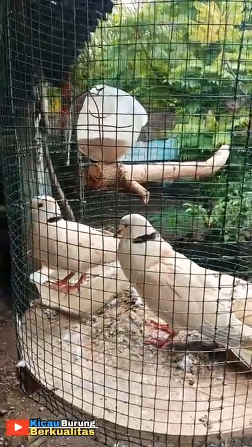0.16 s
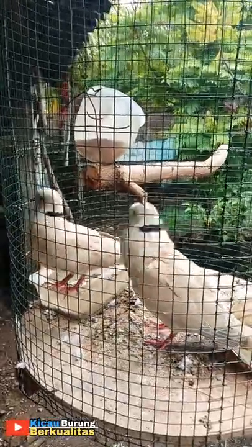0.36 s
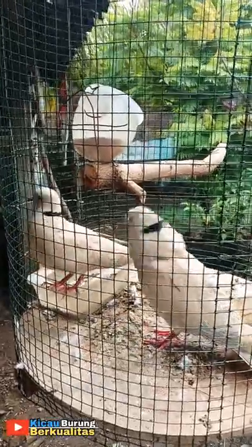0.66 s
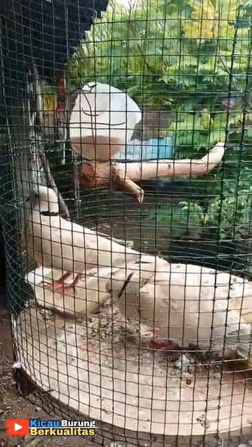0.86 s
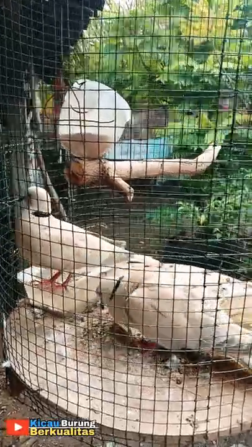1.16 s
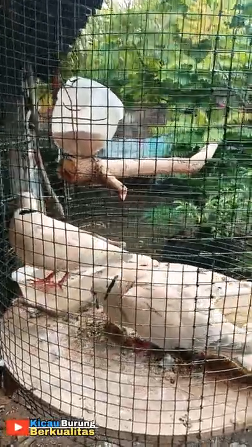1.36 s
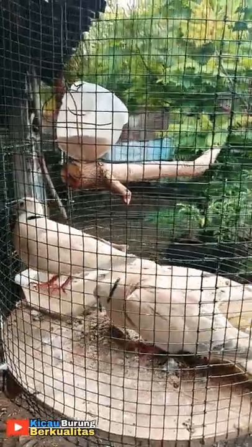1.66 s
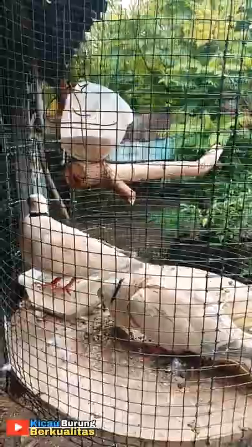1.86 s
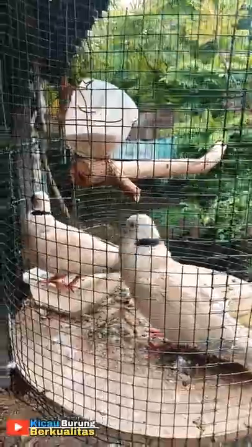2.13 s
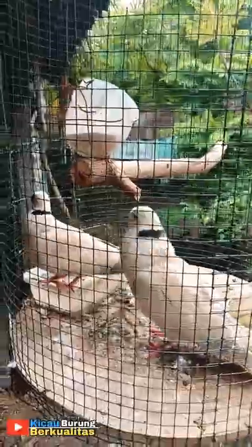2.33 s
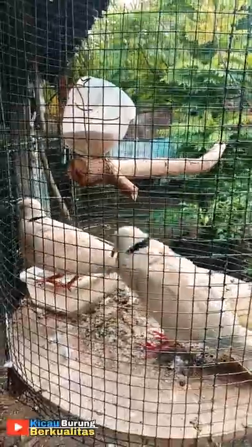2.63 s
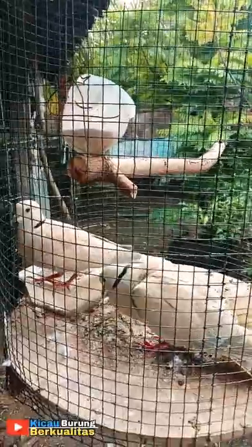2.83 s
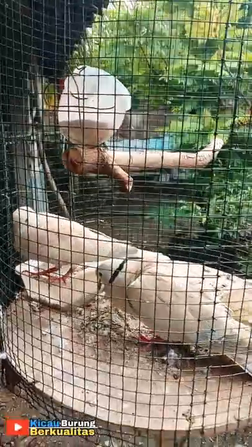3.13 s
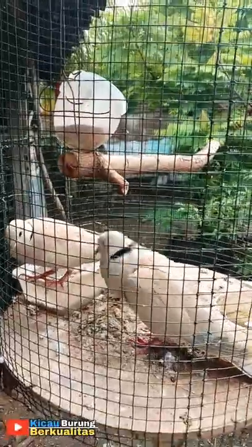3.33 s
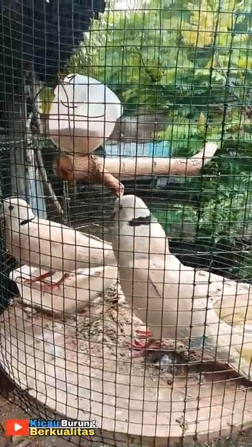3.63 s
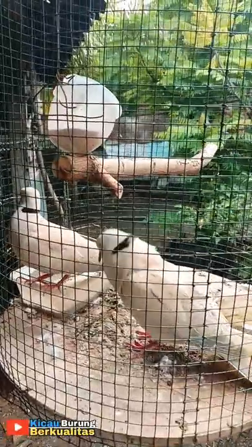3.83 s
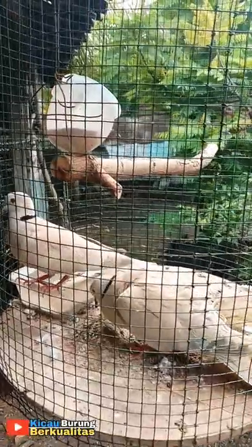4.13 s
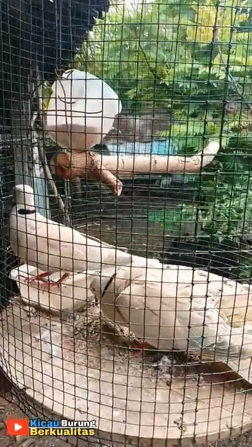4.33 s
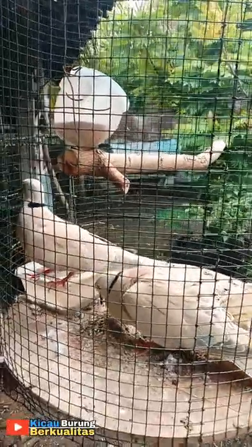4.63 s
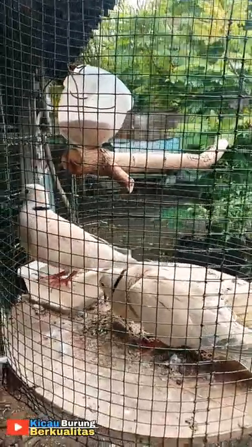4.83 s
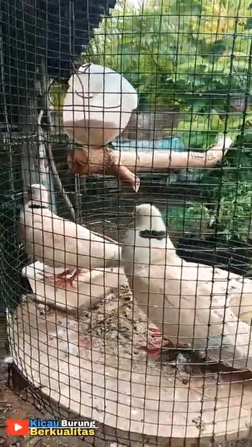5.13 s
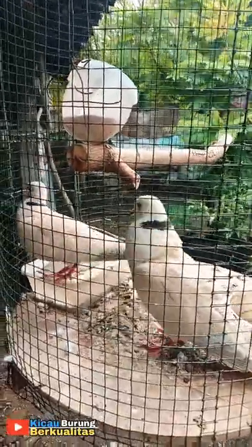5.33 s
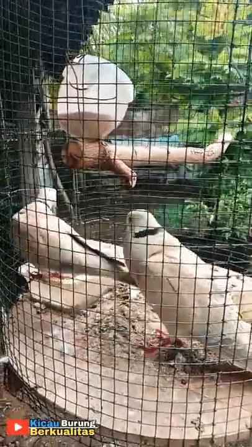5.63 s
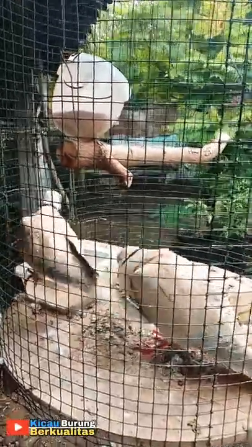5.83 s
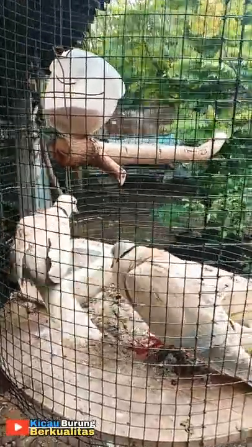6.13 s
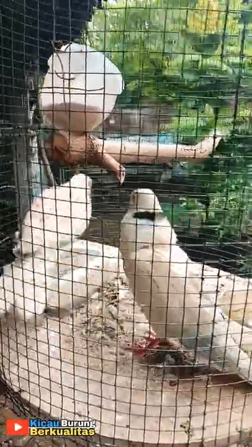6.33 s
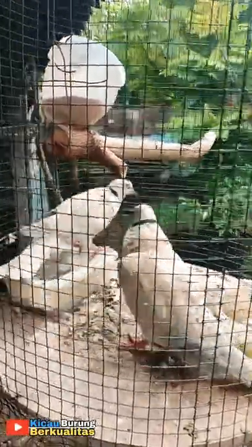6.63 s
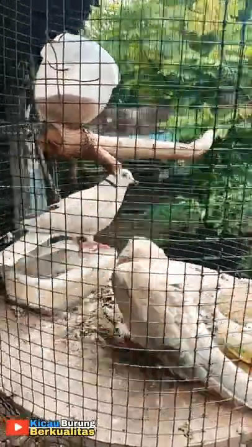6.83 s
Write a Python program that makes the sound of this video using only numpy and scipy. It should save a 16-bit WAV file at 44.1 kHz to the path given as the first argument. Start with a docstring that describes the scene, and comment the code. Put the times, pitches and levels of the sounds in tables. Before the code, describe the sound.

In a garden cage, a near dove dominates, close and nearly dry. The tail of a long, hollow coo sighs away by 0.25 s. At 0.8 s a short note flips upward, then from 1.0 to 1.8 s a throaty trill rolls faster and louder into a steady mid-pitched coo, breaking lower at 2.3 s and sighing out by 2.6 s. Distant doves hoot, growl and trill around 2.6-3.9 s. The near phrase repeats: short note at 3.95, trill from 4.2, long coo from 5.0, break at 5.5, sigh to 5.9. A hoarse far trill and coo answer until 6.7. Faint chick peeps and thin whistles scatter throughout; a hen calls very faintly at 0.8-1.7 s. Small claw taps grow into sharper wood and wire rattles at 5.7 and 6.2-6.5 s, with light feather and foot rustles. A last short note begins near 6.9 s. Quiet leaves and far-road rumble lie beneath.

```python
"""Collared dove in a garden cage

A near dove coos: a short note, a rolling trill, a long note that breaks down into a sigh; far doves answer.
All bird voices are sines with wandering pitch and level; growls, murmur and throat air are shaped noise.
Chicks peep, a hen calls faintly; taps are noise bursts that also ring perch modes, rustles are noise strokes.
Behind: leaf noise stirred band by band and the rumble of a far road."""
import sys
import numpy as np
from scipy import signal
from scipy.fft import rfft, irfft, next_fast_len
from scipy.io import wavfile
from scipy.ndimage import uniform_filter1d, map_coordinates

SR = 44100
rng = np.random.default_rng(int(sys.argv[2]) if len(sys.argv) > 2 else 0)


def master(y):
    """Save y as 16-bit WAV."""
    cut = np.clip(np.atleast_2d(y).T, -1, 1)
    pcm = np.round(cut * 32767)  # scale
    wavfile.write(sys.argv[1], SR, pcm.astype(np.int16))


N = 307818
TIME = np.arange(N) / SR
BREAK_S = 0.004  # speed of a voice break


# near dove, short notes: break_s, scoop_s (before break), length_s (after break), swell_db
SHORT_NOTES = [(0.789, 0.029, 0.15, 10), (3.947, 0.028, 0.18, 7), (6.924, 0.033, 0.13, 22)]
# short-note harmonics, fundamental up: gain_db
SHORT_NOTE_OVERTONES = [1, -34, -51, -52.5]
# near dove, long coos: start_s, break_s, end_s, pitch_hz, level_db (before harmonics), swell_db
COOS = [(-0.6, -0.062, 0.25, 514, -21.5, 3), (1.808, 2.289, 2.6, 511.9, -24, 5),
        (4.971, 5.543, 5.91, 517.1, -22, 3)]
# near dove, two trills: start_s, level_db (before harmonics)
BEATS = [(1.04, -41.5), (1.132, -39), (1.187, -36), (1.226, -36), (1.27, -30.5), (1.314, -29.5),
         (1.356, -28), (1.404, -27), (1.452, -25), (1.505, -24.5), (1.567, -22.5), (1.631, -20),
         (1.716, -20.5), (4.22, -37.5), (4.266, -36), (4.311, -35), (4.358, -32), (4.4, -32.5),
         (4.441, -31), (4.483, -29.5), (4.526, -26.5), (4.569, -26.5), (4.616, -26), (4.669, -24.5),
         (4.729, -20.5), (4.796, -20), (4.876, -20)]
# coo harmonics, fundamental up: gain_db
NEAR_OVERTONES = [0.5, -42.5, -58]
# spectrum of throat air and of the blurred far doves: freq_hz, gain_db (relative)
MURMUR_COLOUR = [(250, -25), (380, -2), (470, 4.5), (540, -9), (600, 0.5), (690, -17.5), (820, -18.5),
                 (1000, -43.5)]


def near_dove(rush_db=-37, trill_rush_db=-23, flutter_db=1.24, settle_s=0.19, sigh_flutter_db=1.5):
    """Close, almost dry voice; coos flutter until settled and in the sigh; throat air follows loudness."""
    calls = [short_note(*row) for row in SHORT_NOTES]
    coos = [long_coo(*row, scoop_s=.04, sag=0.063, drop_db=8, sigh_db=11.5, step_db=5.5) for row in COOS]
    unsteady_db = np.zeros(N)
    for s, break_s, end_s, *_ in COOS:
        sigh = np.clip((TIME - break_s) / (end_s - break_s), 0, 1)
        unsteady_db += flutter_db * np.exp(-((TIME - s) / settle_s) ** 2)
        unsteady_db += sigh_flutter_db * np.sin(np.pi * sigh)
    song = held_notes(calls, SHORT_NOTE_OVERTONES, jitter=.004, shimmer_db=.7, fade_s=.008)
    long_notes = held_notes(coos, NEAR_OVERTONES, jitter=.003, shimmer_db=.25, fade_s=.008)
    song += from_db(unsteady_db * drift(85)) * long_notes
    rolls = trill(BEATS, top_db=-19.5, top_hz=484, hum_hz=418, hum_db=-29.0, hum_s=0.052,
                  hum_below_db=4.5, dip=.04, edge_s=0.0032, rough_db=2.0)
    rush = from_db(rush_db) * np.abs(song) + from_db(trill_rush_db) * np.abs(rolls)
    airflow = uniform_filter1d(rush, size=400)
    return scatter(song + rolls + airflow * noise(MURMUR_COLOUR), t60_s=.35, wet_db=-28)


def short_note(s, scoop_s, length_s, swell_db, low_hz=385, break_hz=495, high_hz=565, sag=.08,
               accent_db=-19, rise_db=22, rest_db=-33, swell_at=0.75, swell_width=0.23, release_db=11):
    """Loud upward scoop breaks to a softer high note that sags, swells, stops: rows s, hz, db."""
    t = np.linspace(-scoop_s, length_s, 300)
    early, u = np.clip(-t / scoop_s, 0, 1), np.clip(t / length_s, 0, 1)
    high = .5 + .5 * np.tanh(t / BREAK_S)
    scoop_hz = break_hz + (low_hz - break_hz) * early
    scoop_db = accent_db - rise_db * early ** 2.0
    note_hz = high_hz * (1 - sag * np.sin(np.pi / 2 * u))
    swell = np.exp(-((u - swell_at) / swell_width) ** 2)
    note_db = rest_db + swell_db * swell - release_db * u ** 10
    hz = scoop_hz + high * (note_hz - scoop_hz)
    db = scoop_db + high * (note_db - scoop_db)
    return np.transpose([s + t, hz, db])


def long_coo(s, break_s, end_s, hz, db, swell_db, scoop_s, sag, drop_db, sigh_db,
             step_db=0, step_after_s=0.156, scoop=0.3, rise_db=12, droop=0.057,
             sigh_start=.83, sigh_fall=.275):
    """Voice scoops up, sags and swells, breaks down to a falling sigh, may step weaker: rows s, hz, db."""
    t = np.linspace(s - scoop_s, end_s, 900)
    early = np.clip((s - t) / scoop_s, 0, 1)
    u = np.clip((t - s) / (break_s - s), 0, 1)
    v = np.clip((t - break_s) / (end_s - break_s), 0, 1)
    broken = .5 + .5 * np.tanh((t - break_s) / BREAK_S)
    spent = .5 + .5 * np.tanh((t - break_s - step_after_s) / BREAK_S)
    held = 1 - scoop * early - sag * u ** 1.5 - droop * u ** 20
    sigh = sigh_start * (1 - sigh_fall * v ** 2)
    level_db = db - rise_db * early ** 2 + swell_db * u
    level_db = level_db - drop_db * broken - sigh_db * v ** 2.3 - step_db * spent
    return np.transpose([t, hz * (held + broken * (sigh - held)), level_db])


def trill(beats, top_db, top_hz, hum_hz, hum_db, hum_s, hum_below_db, dip, edge_s, rough_db,
          arch=.04, pause_s=.007):
    """Abrupt beats arch in pitch, higher and longer with effort; a weaker, rougher hum fills the gaps."""
    out, tremor, quaver = np.zeros(N), drift(130), drift(90)
    next_starts = [row[0] for row in beats[1:]] + [np.inf]
    for (s, db), following in zip(beats, next_starts):
        length_s = .01 + .02 * np.exp((db - top_db) / 2.5)
        hz = top_hz * np.exp((db - top_db) / 60)
        on = (TIME > s - .02) & (TIME < s + .12)
        t = TIME[on] - s
        opened = .5 + .5 * np.tanh(t / edge_s)
        closed = .5 + .5 * np.tanh((t - length_s) / edge_s)
        gap_s = np.clip(following - s - length_s - pause_s, .005, hum_s)
        after = np.clip((t - length_s) / gap_s, 0, 1)
        bow = np.abs(np.sin(np.pi * after))
        beat = from_db(db) * opened * (1 - closed)
        hum = from_db(min(db - hum_below_db, hum_db)) * np.sqrt(bow) * (1 - after / 2)
        high_hz = hz * (1 + arch * (np.sin(np.pi * np.clip(t / length_s, 0, 1)) - .5))
        low_hz = min(hz, hum_hz) * (1 - dip * bow)
        pitch_hz = (high_hz + closed * (low_hz - high_hz)) * (1 + .012 * quaver[on])
        roughness = from_db(rough_db * closed * tremor[on])
        out[on] += (beat + hum) * roughness * voice(pitch_hz, NEAR_OVERTONES)
    return out


def held_notes(notes, overtones, jitter, shimmer_db, fade_s):
    """Sung notes follow pitch and level curves with a slight quaver."""
    out, quaver, tremor = np.zeros(N), drift(70), drift(60)
    for rows in notes:
        hz, db = in_time(rows)
        inside_s = np.minimum(TIME - rows[0][0], rows[-1][0] - TIME)
        gate = np.clip(1 + inside_s / fade_s, 0, 1)  # fades lie outside the note
        on = gate > 0
        level = from_db(db[on] + shimmer_db * tremor[on]) * np.sin(np.pi / 2 * gate[on]) ** 2
        out[on] += level * voice(hz[on] * (1 + jitter * quaver[on]), overtones)
    return out


def voice(hz, overtones_db, wander_db=3.5):
    """Harmonic sines; those above the fundamental come and go as the bird moves."""
    phase = 2 * np.pi * (np.cumsum(hz) / SR + rng.random())
    out = np.zeros(len(hz))
    for k, db in enumerate(overtones_db, 1):
        gain = from_db(db + (k > 1) * wander_db * drift(30, size=len(hz)))
        out += gain * np.sin(k * phase)
    return np.sqrt(2) * out


# far coos: start_s, break_s, end_s, pitch_hz, level_db (before harmonics), swell_db, sag_share
FAR_COOS = [(3.649, 3.947, 4.29, 529, -41, 1.5, .11), (6.24, 6.544, 6.72, 485.6, -40.5, 0, 0.0637)]
# far coo harmonics, fundamental up: gain_db
FAR_OVERTONES = [2.4]
# plain sagging hoots: start_s, length_s, start_pitch_hz, level_db (before harmonics, low-pass)
HOOTS = [(0.268, 0.54, 425, -50.5), (0.312, 0.14, 634, -51), (2.6, 0.056, 592, -40),
         (2.712, 0.306, 418.8, -51), (3.071, 0.17, 369.6, -57), (4.99, 0.3, 410, -50)]
# hoot harmonics, fundamental up: gain_db
HOOT_OVERTONES = [2.5, -19.5]
# far, halting trill beats: start_s, level_db (before harmonics)
FAR_BEATS = [(3.283, -38), (3.352, -42.5), (3.418, -38), (3.512, -36.5), (5.875, -35), (5.945, -34),
             (6.04, -34.5), (6.118, -34.5)]
# hoarse toneless stretches: start_s, length_s, peak_level_db
GROWLS = [(1.57, 0.1, -40), (2.426, 0.21, -50), (3.104, .16, -57), (3.758, 0.21, -43), (6.157, 0.2, -44.5)]
# growl spectrum: freq_hz, gain_db (relative)
GROWL_COLOUR = [(400, -16), (520, -4), (600, 5), (680, -3.5), (800, -12), (950, -32.5)]
# blur of many doves: time_s, level_db (before murmur_db)
MURMUR = [(0.0, -49.5), (0.9, -54.5), (1.94, -62), (2.55, -44.5), (2.82, -62.5), (3.4, -63.5),
          (3.88, -47.5), (4.04, -52.5), (4.86, -46.5), (6.04, -64.5), (6.26, -57), (6.98, -48.5)]


def far_doves(murmur_db=4, hoot_sag=0.083, throat_hz=860):
    """Answering voices, wetter, hoarser, less steady, over a swelling noise murmur of the rest."""
    notes = [long_coo(*row, scoop_s=0.12, sag=sag, drop_db=2.0, sigh_db=13.0,
                      sigh_start=.775, sigh_fall=0.1415) for *row, sag in FAR_COOS]
    coos = held_notes(notes, FAR_OVERTONES, jitter=0.0022, shimmer_db=2.5, fade_s=0.03)
    sagging = [[(s, hz, db), (s + length_s, hz * (1 - hoot_sag), db)] for s, length_s, hz, db in HOOTS]
    hoots = held_notes(sagging, HOOT_OVERTONES, jitter=0.0021, shimmer_db=1.5, fade_s=0.04)
    hoots = signal.sosfilt(signal.butter(10, throat_hz, fs=SR, output="sos"), hoots)
    rolls = trill(FAR_BEATS, top_db=-32, top_hz=478, hum_hz=415.0, hum_db=-37, hum_s=0.062,
                  hum_below_db=5, dip=0.1436, edge_s=0.0067, rough_db=3.5)
    growls = sum(from_db(db) * stroke(s, length_s) for s, length_s, db in GROWLS)
    calls = coos + hoots + rolls + growls * noise(GROWL_COLOUR)
    swell_db = 3 * drift(14)
    murmur = from_db(in_time(MURMUR)[0] + murmur_db + swell_db) * noise(MURMUR_COLOUR)
    return scatter(calls, t60_s=.3, wet_db=-7) + murmur


# claws, beaks on wood and wire: start_s, tick_db (before tick_db trim), knock_db (relative drive)
TAPS = [(0.464, -44, -64), (1.8777, -43, -51), (1.9445, -46, -61), (2.412, -45.5, -64), (3.1434, -54, -82),
        (3.829, -57.5, -53), (4.6502, -55, -48), (4.691, -41.5, -58), (5.1351, -40, -44.5),
        (5.4959, -67, -51.5), (5.662, -30.5, -53), (5.707, -42.5, -43.5), (5.8482, -52, -48.5),
        (6.2138, -29, -36.5), (6.324, -36, -40.5), (6.352, -34.5, -35), (6.427, -32, -41),
        (6.451, -32.5, -46.5), (6.756, -44, -62), (6.7853, -49, -59.5)]
# tick spectrum: freq_hz, gain_db (relative)
TICK_COLOUR = [(1500, -20.5), (2800, 0), (4000, -4.5), (5500, 2), (7300, 4.5), (9000, -6.5), (12000, -19),
               (15500, -9)]
# perch modes: freq_hz (mean-ish, varies per tap), gain_db, t60_s
PERCH_MODES = [(1266, 6.5, 0.032), (1628, 6, 0.016), (1640, -5.5, 0.012), (3050, -13, 0.018)]


def taps(onset_s=0.00052, crack_s=0.0035, rattle_s=0.026, rattle_db=-15, tick_db=-8,
         chatter_db=3, spot_spread=0.0078):
    """Brief contact, uneven mesh rattle; noise drives perch modes, detuned a little at each spot."""
    tick, wood = np.zeros(N), np.zeros(N)
    for s, bright_db, woody_db in TAPS:
        on = (TIME >= s) & (TIME < s + .15)
        t = TIME[on] - s
        decay = np.exp(-t / crack_s) + from_db(rattle_db) * np.exp(-t / rattle_s)
        blow = np.minimum(t / onset_s, 1) * decay
        tick[on] += from_db(bright_db + tick_db) * blow
        grit = rng.standard_normal(SR // 4)[:len(t)]
        force = from_db(woody_db) * blow / np.linalg.norm(blow) * grit
        for hz, db, t60_s in PERCH_MODES:
            mode_hz = hz * (1 + spot_spread * rng.uniform(-0.92, 1))
            wood[on] += from_db(db) * ring(force, mode_hz, t60_s)
    rattle = tick * from_db(chatter_db * drift(400)) * noise(TICK_COLOUR)
    return scatter(rattle + wood, t60_s=0.059, wet_db=-12.0)


def ring(x, hz, t60_s):
    """Two-pole resonator: a unit click starts a decaying sine of height 1."""
    r, w = from_db(-60 / (t60_s * SR)), 2 * np.pi * hz / SR
    return signal.lfilter([0, np.sin(w)], [1, -2 * r * np.cos(w), r * r], x + 1e-18)


# feathers brush, feet shuffle: start_s, length_s, hiss_db, scrape_db (peak, before grain)
RUSTLES = [(0.958, 0.13, -62.5, -82.5), (1.114, 0.087, -55.5, -92), (4.222, 0.073, -57.5, -58),
           (4.827, 0.061, -90, -50.5), (6.414, 0.078, -51.5, -55), (6.624, 0.066, -57.5, -67)]
# feather spectrum: freq_hz, gain_db (relative)
HISS_COLOUR = [(4000, -5), (5800, 1), (7400, 4.5), (8800, -25), (15000, -31.5)]
# foot spectrum: freq_hz, gain_db (relative)
SCRAPE_COLOUR = [(700, -10), (1250, 14), (1700, 1.5), (2600, -4.5), (5000, -27)]


def rustles(grain_db=3.0):
    """Feathers hiss, feet scrape: grainy half-sine strokes of shaped noise."""
    hiss, scrape = np.zeros(N), np.zeros(N)
    for s, length_s, hiss_db, scrape_db in RUSTLES:
        hiss += from_db(hiss_db) * stroke(s, length_s)
        scrape += from_db(scrape_db) * stroke(s, length_s)
    brushed = hiss * noise(HISS_COLOUR) + scrape * noise(SCRAPE_COLOUR)
    return brushed * from_db(grain_db * drift(270))


# peeps, hold then drop hoarsely: start_s, length_s, start_pitch_hz, level_db (before chicks' level_db)
PEEPS = [(0.097, 0.077, 4340, -65), (0.605, 0.11, 5350, -60.5), (1.382, .18, 3755, -67),
         (2.083, 0.047, 3705, -69.5), (2.149, 0.082, 4300, -71.5), (2.244, 0.14, 3890, -73.5),
         (2.774, 0.13, 3840, -68), (2.965, 0.058, 3900, -70), (3.331, 0.079, 3670, -63),
         (3.668, .13, 3774, -62.5), (3.83, 0.072, 4380, -68), (3.95, .06, 3530, -65.5),
         (4.41, 0.073, 3830, -62), (4.621, 0.11, 3830, -60.5), (5.224, .19, 3890, -70.5),
         (5.592, 0.058, 3504, -58), (5.707, 0.057, 4000, -66), (6.739, 0.12, 3950, -75.5)]
# thin whistles: start_s, length_s, start_pitch_hz, level_db (before chicks' level_db)
WHISTLES = [(0.161, 0.22, 5415, -63.5), (0.298, 0.32, 2653, -69.5), (0.425, 0.2, 3530, -66),
            (1.02, 0.15, 2780, -71), (1.545, 0.26, 2696, -72), (1.923, 0.23, 5200, -75),
            (2.786, 0.22, 5337, -73), (3.561, 0.14, 4100, -67.5), (3.621, .16, 4290, -71.5),
            (4.491, 0.15, 3956, -68), (5.432, 0.18, 4210, -74), (5.93, 0.72, 2780, -77.5),
            (5.95, 0.64, 3420, -78)]
# raspy cheeps: start_s, length_s, start_pitch_hz, level_db (before chicks' level_db), octave_db
CHEEPS = [(0.349, 0.047, 3053, -65, 5), (3.746, 0.072, 2960, -69.5, 4.5), (4.323, 0.056, 2852, -62, -7),
          (5.529, 0.047, 3028, -60.5, -8.5)]


def chicks(flutter_db=5.5, level_db=3, rasp_share=0.022):
    """Fluttering sines: dropping peeps, whistles that sink more the higher, cheeps, a faint flock."""
    out, quaver, flutter = np.zeros(N), drift(900), drift(150)

    def call(s, length_s, hz, db, fall, bend, rasp_start, rasp_end, overtones_db=(0,)):
        """One call: pitch loses the share fall along a bend while pitch rasp changes."""
        on = (TIME > s) & (TIME < s + length_s)
        u = (TIME[on] - s) / length_s
        rasp = rasp_share * (rasp_start + (rasp_end - rasp_start) * u ** 3)
        wobble = 1 + rasp * quaver[on] + .006 * drift(30, size=len(u))
        pitch_hz = hz * (1 - fall * u ** bend) * wobble
        envelope = np.sqrt(np.sin(np.pi * u ** np.sqrt(bend)))
        out[on] += from_db(db + flutter_db * flutter[on]) * envelope * voice(pitch_hz, overtones_db)

    for row in PEEPS:
        call(*row, fall=0.31, bend=2.4, rasp_start=.2, rasp_end=4)
    for s, length_s, hz, db in WHISTLES:
        fall = .22 * np.log(hz / 3200)  # below 3200 Hz they rise
        call(s, length_s, hz, db, fall, bend=1, rasp_start=.4, rasp_end=.5)
    for *row, octave_db in CHEEPS:
        call(*row, fall=0.07, bend=1, rasp_start=.6, rasp_end=.9, overtones_db=[0, octave_db])
    for when, span, pitch in rng.random((70, 3)):  # flock
        call(when * TIME[-1], .2 * span, 2600 + 2600 * pitch ** 2, -82,
             fall=.1 * pitch, bend=1, rasp_start=.4, rasp_end=1)
    return from_db(level_db) * scatter(out, t60_s=.3, wet_db=-3)


# hen's run of calls: start_s, pitch_hz (before scoop, sag), level_db (before harmonics)
HEN = [(0.79, 535, -72.5), (0.965, 524, -68.5), (1.182, 521, -70.5), (1.412, 498, -65), (1.612, 442, -68)]


def hen(length_s=0.135, sag=.05):
    """Short nasal harmonic calls scoop up to pitch and sink a little."""
    out, quaver, flutter = np.zeros(N), drift(200), drift(80)
    for s, hz, db in HEN:
        on = (TIME > s) & (TIME < s + length_s)
        u = (TIME[on] - s) / length_s
        pitch_hz = hz * (1 - 0.3 * np.exp(-6 * u) - sag * u ** 4 + 0.024 * quaver[on])
        level = from_db(db + 2 * flutter[on]) * np.sin(np.pi * u) ** 0.54
        out[on] += level * voice(pitch_hz, overtones_db=[19, 6.9, 1.5])
    return scatter(out, t60_s=0.15, wet_db=-5)


# garden air spectrum: freq_hz, gain_db (relative)
AIR_COLOUR = [(220, -4), (700, -6.5), (950, -13.5), (1270, -2.5), (1650, -13.5), (5000, -14), (7300, -10),
              (8600, -28), (15500, -28.5)]
# far road: time_s, level_db (before lumps)
RUMBLE = [(0, -53), (1.3, -60), (4.3, -57), (4.7, -51), (5.2, -55), (6.98, -52.5)]
# far road spectrum: freq_hz, gain_db (relative)
RUMBLE_COLOUR = [(45, -17.5), (62, -0.5), (90, -6), (120, -0.5), (160, -12.5), (230, -19.5), (400, -30)]


def garden(air_db=-69):
    """Leaves stir unevenly, each noise band on its own, over the lumpy rumble of a far road."""
    lumps_db = 2 * drift(11)
    air, stirred = noise(AIR_COLOUR), np.zeros(N)
    for edge_hz in np.geomspace(700, 9000, 9):
        band = signal.sosfiltfilt(signal.butter(4, edge_hz, fs=SR, output="sos"), air)
        air = air - band  # remainder above the edge
        stirred += band * from_db(2 * drift(20))
    rumble = from_db(in_time(RUMBLE)[0] + lumps_db) * noise(RUMBLE_COLOUR)
    return from_db(air_db) * (stirred + air) + rumble


def scatter(x, t60_s, wet_db):
    """Add the diffuse echo of walls and foliage: a decaying noise tail."""
    t = TIME[:SR // 2]
    tail = rng.standard_normal(len(t)) * from_db(-60 * t / t60_s) * (t > .004)
    return x + from_db(wet_db) * signal.fftconvolve(x, tail / np.linalg.norm(tail))[:N]


def noise(colour):
    """Unit-rms noise through freq_hz, gain_db points, falling away beyond them."""
    hz, db = np.transpose(colour)
    size = next_fast_len(N, True)
    log_f = np.log(np.fft.rfftfreq(size, 1 / SR) + 1)
    outside = np.abs(log_f - np.clip(log_f, np.log(hz[0]), np.log(hz[-1])))
    gain = from_db(np.interp(log_f, np.log(hz), db) - 40 * outside)
    return rms_one(irfft(rfft(rng.standard_normal(size)) * gain, size)[:N])


def drift(rate_hz, size=N):
    """Smooth random wander of about unit spread: splined knots at rate_hz."""
    knots = rng.standard_normal(4096)
    return map_coordinates(knots, [TIME[:size] * rate_hz], order=3, mode="wrap")


def stroke(s, length_s):
    """Half-sine envelope, peak 1."""
    return np.abs(np.sin(np.pi * np.clip((TIME - s) / length_s, 0, 1)))


def in_time(rows):
    """Curve columns, linear between rows."""
    s, *columns = np.transpose(rows)
    return [np.interp(TIME, s, c) for c in columns]


def from_db(db):
    """Decibels to gain."""
    return 10 ** (np.asarray(db) / 20)


def rms_one(x):
    """Scale to unit rms."""
    return x / np.sqrt(np.mean(x ** 2) + 1e-20)


def scene():
    """All sources in the middle: two equal channels."""
    middle = near_dove() + far_doves() + taps() + rustles() + chicks() + hen() + garden()
    return np.array([middle, middle])


def record(dry, cutoff_hz=15900):
    """Steep elliptic low-pass cuts the top."""
    return signal.sosfilt(signal.ellip(10, .1, 90, cutoff_hz, fs=SR, output="sos"), dry)


dry = scene()
out = record(dry)
master(out)
```